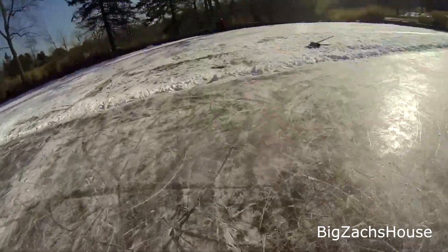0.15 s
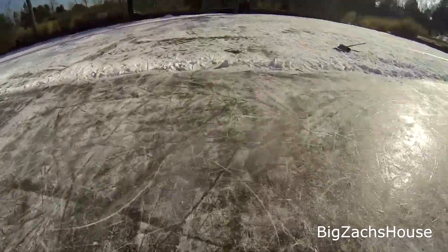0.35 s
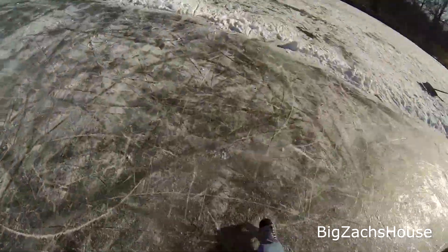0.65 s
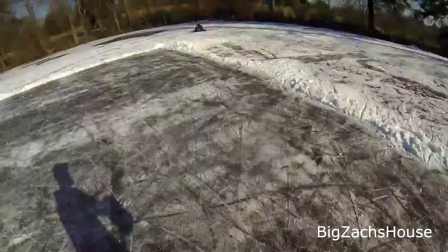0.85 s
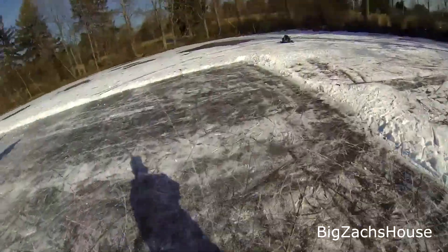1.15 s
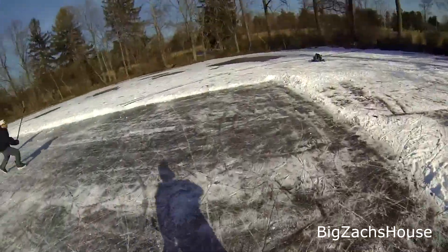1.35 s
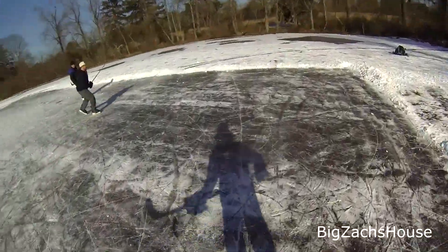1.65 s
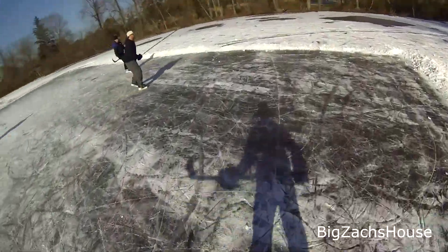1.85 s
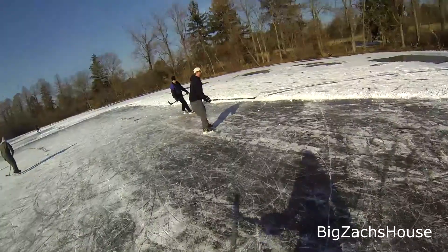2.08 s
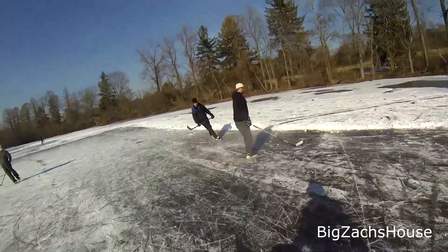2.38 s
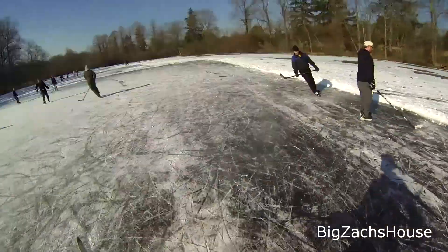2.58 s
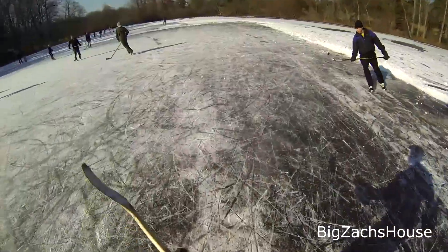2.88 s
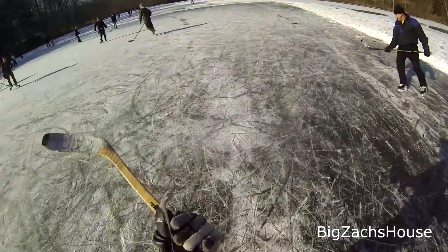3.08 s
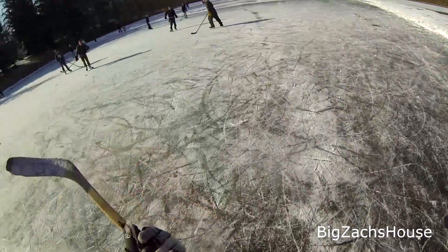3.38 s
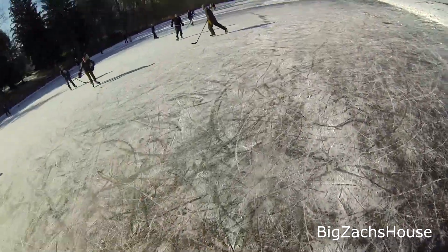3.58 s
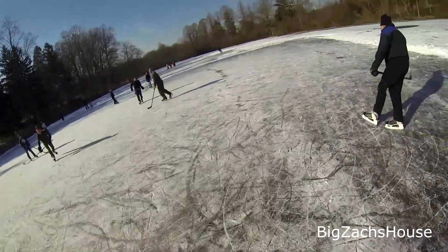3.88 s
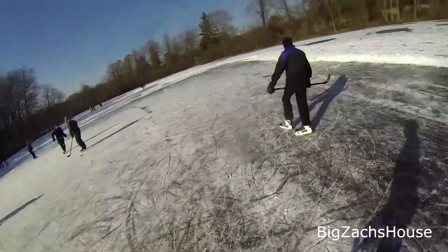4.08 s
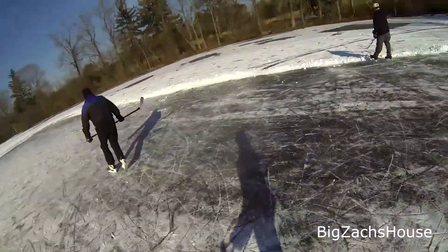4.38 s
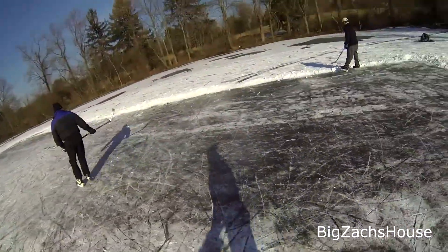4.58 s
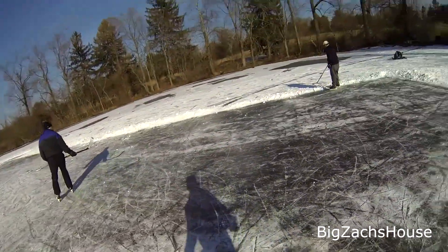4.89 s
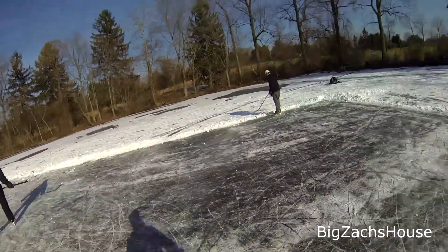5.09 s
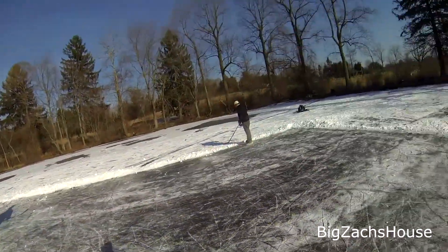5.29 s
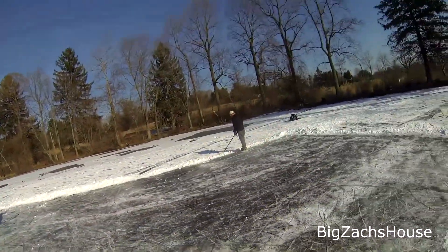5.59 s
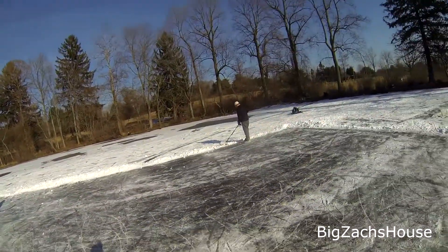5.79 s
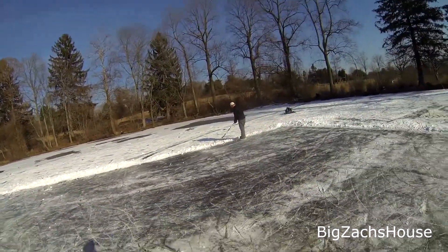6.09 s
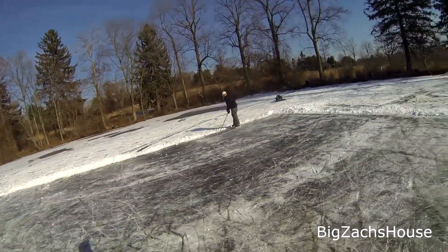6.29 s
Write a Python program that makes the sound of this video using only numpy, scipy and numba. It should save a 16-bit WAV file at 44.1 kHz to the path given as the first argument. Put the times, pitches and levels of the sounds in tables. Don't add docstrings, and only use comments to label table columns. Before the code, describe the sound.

A skater moves over a frozen pond, heard close from a head-mounted camera in a closed plastic housing, so everything is boxy and short on treble. The blade shaves and glides from the start, swelling into its hardest, hissing scrape at about 0.8-0.9 s, then easing to lighter, chattering strokes. Small dry knocks of sticks and pucks dot the opening; crumbly ice ticks crowd in from 1 to 2 s. Low wind thumps and flutters on the microphone, heaviest from about 1.4 to 3 s. A bright, quick falling chirp in the ice lands at 2.4 s. Another wind thump and a tight cluster of sharp stick clicks come around 4.2 s. After 5 s the wind fades, leaving faint hiss, soft scrapes and a wavering low ice hum, clearest near 5.7 s. A dull, quick blow and knock sound at 6.26 s.

```python
import sys
import numpy as np
from scipy import signal
from scipy.fft import rfft, irfft
from scipy.io import wavfile
from scipy.ndimage import uniform_filter1d
from numba import njit

SR = 44100
rng = np.random.default_rng(int(sys.argv[2]) if len(sys.argv) > 2 else 0)


def invert_db(x):
    u = np.asarray(x, float) / 20
    return 10 ** u


def wrap_up_sound(samples):
    columns = np.atleast_2d(samples).T
    tamed = np.clip(columns, -1, 1)
    steps = np.round(tamed * 32767).astype(np.int16)
    wavfile.write(sys.argv[1], SR, steps)


N = 284445

# (time [s], strength [dB], turbulence [dB])
WIND_GUSTS = [(0.0, -31, -1.5), (.4, -25.5, -13), (.63, -40, 6.5), (.9, -32.5, 1), (1.17, -34.5, -3.5),
              (1.27, -26, -11), (1.4, -20, -9), (1.7, -15.5, -7), (2.2, -23, -1.5), (2.65, -16.5, -6.5),
              (3.0, -24, -3.5), (3.12, -27.5, -3.5), (3.25, -25.5, -10.5), (3.38, -30, -4.5),
              (3.5, -45, -21), (3.58, -28.5, -12), (3.68, -29, -17), (4.15, -21, -12), (4.58, -24, -11),
              (4.66, -39.5, -20), (5.3, -45.5, -12), (6.45, -50, -0.5)]
# (time [s], strength [dB], heave share [dB])
PORT_SLAPS = [(.42, -29, 3), (1.4, -43, -15), (1.64, -22, 4), (1.72, -18.5, -10), (1.92, -18, -8),
              (2.12, -18.5, -2), (2.25, -20, 4), (2.35, -20, 7.5), (2.49, -16, -24), (2.64, -32, 8),
              (2.93, -27, -0.5), (3.36, -38, 19), (3.65, -28.5, 11), (3.88, -44, 4), (4.02, -22.5, -2),
              (4.22, -17, -20), (4.56, -31, 18), (4.9, -54, 25), (5.51, -40.5, 12), (5.62, -34.5, 13.5),
              (5.84, -42.5, 14), (6.041, -46, 21), (6.2, -37, 7)]
# (frequency [Hz], level [dB per Hz])
FLUTTER_SPECTRUM = [(71, -41), (120, 5), (247, -3.5), (430, -10), (700, -14.5), (910, -47), (1540, -120)]
# (peak time [s], rise [s], fall [s], level [dB])
GLIDE_HUMS = [
    (5.09, 0.067, 0.052, -40),
    (5.2, 0.016, 0.032, -41),
    (5.322, 0.006, 0.046, -34.5),
    (5.66, 0.11, 0.2, -34.5),
    (5.85, 0.055, 0.066, -35.5),
    (6.058, 0.02, 0.013, -38),
    (6.15, .015, 0.026, -38),
    (6.32, 0.05, 0.043, -42.5),
]
# (time [s], peak level [dB], first pitch [Hz], time to peak [s], narrowness [1])
ICE_PINGS = [
    (2.3901, -10.5, 4400, .0012, 4.5),
    (6.2637, -8.5, 1700, .00052, .8),
    (4.5965, -25, 2600, .001, 2.5),
]
# (time [s], peak level [dB], body [Hz], ring t60 [s], crack re ring [dB])
STICK_KNOCKS = [(0.241, -13, 880, 0.0088, 21), (0.452, -17, 800, 0.011, 8), (1.083, -13.5, 1680, 0.017, 0),
                (1.175, -22, 1670, 0.019, 7), (1.311, -25, 1700, 0.023, 0), (1.651, -24, 1610, 0.017, -5),
                (1.965, -24, 905, 0.013, 15), (2.2065, -15.5, 1690, 0.011, 6),
                (2.224, -22, 1620, 0.021, -3), (2.3935, -22, 1500, 0.015, 15),
                (2.9365, -19.5, 860, 0.026, 3), (2.984, -21, 860, 0.03, -5), (3.56, -24, 940, 0.02, -3),
                (3.642, -20, 810, 0.018, 2), (4.031, -18.5, 920, 0.02, -6), (4.14, -20, 1010, 0.0065, 8),
                (4.1615, -13.5, 920, 0.0086, 10), (4.163, -14, 1120, 0.0059, 23),
                (4.1765, -10, 900, 0.0091, 19), (4.1783, -19.5, 1084, 0.033, 26),
                (4.5975, -30, 1200, 0.0083, -8), (4.602, -23.5, 1620, 0.0064, 1),
                (4.606, -34, 1580, 0.0092, -10), (4.96, -30, 870, 0.017, 7), (5.277, -30, 1750, 0.017, -9),
                (5.391, -24, 830, 0.01, 7), (6.2642, -19, 1680, 0.012, 10), (6.2672, -17.5, 930, 0.022, 8)]
# (time [s], peak level [dB], tick [Hz], dull body re tick [dB])
ICE_CHIPS = [(0.879, -37, 3380, 12), (1.0441, -42, 3570, 12), (1.0826, -29, 3580, 12),
             (1.127, -35, 3510, 11), (1.237, -29, 3570, 9), (1.309, -43, 3590, 14), (1.3484, -48, 3510, 10),
             (1.4234, -40.5, 3670, 12), (1.4684, -38, 3810, 14), (1.513, -46, 3340, 14),
             (1.5389, -37, 3880, 17), (1.6039, -39, 3390, 12), (1.6399, -47, 3350, 12),
             (1.6504, -49, 3420, 12), (1.7026, -42, 3880, 12), (1.719, -37, 3750, 16.5),
             (1.77, -42, 3370, 12), (1.8248, -45, 3500, 12), (1.9444, -49, 3320, 12),
             (1.9628, -39, 3440, 16), (2.1129, -45, 3830, 12), (2.2064, -48, 3580, 7),
             (2.2239, -44, 3320, 9), (2.3989, -49, 3330, 12), (2.5238, -43, 3480, 12),
             (2.7671, -40, 3780, 10), (2.9863, -47, 3360, 12), (3.2846, -42.5, 3780, 11),
             (3.3938, -41, 3710, 12), (3.4303, -38, 3480, 12), (3.4607, -37, 3710, 13),
             (3.8777, -38, 3700, 12), (4.139, -44, 3330, 12), (4.1633, -35, 3640, 13),
             (4.1751, -30, 3540, 12), (4.2988, -40, 3350, 12), (5.5814, -41, 3560, 10),
             (5.7924, -35, 3530, 15)]
# (time [s], peak level [dB], tick [Hz])
ICE_SPLINTERS = [(1.0063, -48, 5280), (1.0442, -48, 5280), (1.1605, -56, 5410), (1.1744, -53, 5110),
                 (1.1989, -51, 5240), (1.2368, -47, 5040), (1.3211, -44, 5690), (1.4244, -51, 5130),
                 (1.468, -45, 5330), (1.4847, -54, 5180), (1.5386, -53, 5060), (1.604, -56, 5030),
                 (1.6379, -51, 5180), (1.6608, -58, 5030), (1.7147, -52, 5490), (1.9352, -54, 5010),
                 (2.0135, -62, 5020), (2.1133, -57, 5090), (2.1557, -57, 5270), (2.225, -51, 5310),
                 (2.2435, -44, 5630), (2.3488, -45, 5130), (2.3902, -43, 8500), (2.4191, -60, 5080),
                 (2.4969, -52, 5000), (2.5244, -47, 5040), (2.6152, -54, 5050), (3.0557, -50, 5180),
                 (3.125, -53, 5120), (3.1619, -53, 5360), (3.1938, -46, 5280), (3.2417, -50, 5090),
                 (3.2916, -51, 5250), (3.3415, -52, 5330), (3.4617, -50, 5500), (3.5685, -52, 8270),
                 (3.6239, -54, 5140), (3.6947, -55, 5000), (3.6947, -53, 5280), (3.8279, -53, 5030),
                 (3.8783, -53, 5330), (3.8987, -52, 5400), (4.1387, -49, 5220), (4.1621, -47, 5050),
                 (4.2205, -54, 5250), (4.2998, -42, 5060)]
# (peak time [s], rise [s], fall [s], pressure [dB], skid as ice thrown re pressure [dB])
EDGE_PUSHES = [(0.0, .1, 0.11, -32.5, -20.5), (.4, 0.34, 0.31, -29.5, -22.5), (.6, 0.29, 0.21, -26.5, -26),
               (.77, 0.21, 0.21, -18, -38.5), (.9, 0.13, 0.12, -19.5, -38.5),
               (1.201, 0.2, 0.27, -36.5, -27.5), (1.55, 0.14, 0.2, -33.5, -37.5),
               (1.801, 0.13, 0.17, -31.5, -34), (2.222, 0.19, 0.11, -33, -32.5),
               (2.48, 0.057, 0.046, -40.5, -27), (2.749, 0.16, 0.25, -32, -28.5),
               (2.92, 0.32, 0.26, -35, -25), (3.3, 0.14, 0.9, -38, -23.5), (3.67, 0.084, 0.039, -44, -30),
               (3.89, 0.12, 0.31, -36.5, -24), (4.25, 0.2, 0.2, -37.5, -23.5),
               (4.62, 0.3, 0.42, -53, -16.5), (5.0, 0.04, 0.11, -47.5, -18), (5.099, 0.11, 0.13, -42, -30),
               (5.38, 0.089, 0.64, -45, -29), (5.691, 0.16, 0.18, -34, -15.5),
               (5.93, 0.18, 0.063, -39, -27), (6.28, 0.52, 0.17, -47, -21.5),
               (6.45, 0.078, .1, -44.5, -36.5)]
# (time [s], weight [dB], drone [Hz], edge lean [dB])
BLADE_GLIDE = [(0.0, -21, 980, 6.5), (.17, -27.5, 800, 6.5), (.3, -24.5, 800, 5), (.55, -23.5, 708, 5.5),
               (.94, -26, 617, 5), (1.14, -32.5, 978, 2.5), (1.75, -36, 900, 7), (2.12, -35.5, 916, 5.5),
               (2.4, -33, 814, 6), (2.66, -27.5, 920, 2), (2.97, -33, 870, 5.5), (3.6, -36.5, 898, 0.5),
               (4.28, -34.5, 905, -2.5), (4.45, -40.5, 910, 1), (5.08, -38.5, 847, 6.5),
               (5.3, -44.5, 734, 2), (5.69, -34.5, 900, 5), (6.02, -44, 803, 2)]
# (time [s], fine ring [Hz], port facing the ice [dB])
HEAD_TURNS = [(0.0, 8900, 3.5), (.3, 8400, 3), (.9, 8200, -0.5), (1.4, 8250, 5), (1.75, 8740, -8),
              (2.5, 8200, 1.5), (2.68, 9700, 1.5), (2.79, 9350, 8.5), (2.9, 8600, 4.5), (3.2, 8700, 2),
              (3.5, 8450, 3), (3.75, 8800, -2), (4.0, 8400, 1), (4.2, 8350, -4), (5.0, 8570, -1),
              (5.3, 9300, -9), (5.7, 10000, 1), (5.95, 9700, -3), (6.45, 8760, -3)]
# (time [s], ring [Hz], ring level [dB])
SEAM_SPRAY = [(0.0, 4660, 0), (.3, 4850, 7), (.7, 4950, 1.5), (1.05, 4820, -4), (1.25, 5250, 7.5),
              (1.45, 4820, -4), (1.9, 4730, 5.5), (2.25, 5000, 2.5), (2.5, 4820, -3), (2.85, 5500, 0),
              (3.3, 5100, -4), (3.6, 5350, 3), (3.95, 5280, 4.5), (4.2, 5120, -7), (5.3, 4930, -6),
              (5.7, 5120, -8.5), (6.45, 5100, -7)]
# (frequency [Hz], level [dB per Hz])
HOUSING_SPECTRUM = [(240, -17.5), (400, 5.5), (480, -7.5), (594, -2.5), (968, -1.5), (1310, -1),
                    (1730, -4.5), (2340, -12.5), (2900, -22), (4120, -44.5), (5330, -48.5), (6910, -53),
                    (8680, -43.5), (12900, -49), (15300, -45)]
# (frequency [Hz], width [Hz], gain [dB])
CAVITY_RINGS = [(1840, 240, 3.5), (2666, 770, 9), (3720, 1040, 8.5), (5080, 1700, 10.5), (6270, 300, 7),
                (8200, 580, 4.5), (12900, 700, 12), (14700, 500, 4), (6900, 380, -3.5), (13800, 600, -3)]

ATTACK_S = 0.0003


def level(x, db=0):
    return x * invert_db(db) / np.sqrt(np.mean(x ** 2))


def curves(table):
    s, *columns = np.transpose(table)
    return [np.interp(np.arange(N) / SR, s, column) for column in columns]


def swells(peak_s, rise_s, fall_s, db):
    swell_db, roundness = 14, 0.63
    t = np.arange(0, N + 64, 64) / SR
    peak = np.c_[peak_s]
    away = (t - peak) / np.where(t < peak, -np.c_[rise_s], np.c_[fall_s])
    swell = np.c_[db] - swell_db * (np.hypot(away, roundness) - roundness)
    power = np.sum(invert_db(swell) ** 2, axis=0)
    return np.interp(np.arange(N) / SR, t, 10 * np.log10(power + 1e-10))


def walk(rate):
    k = max(int(SR / rate), 2)
    held = np.repeat(rng.standard_normal(N // k + 1), k)
    return 1.47 * uniform_filter1d(uniform_filter1d(held, k), k)[:N]


def noise():
    return rng.standard_normal(N)


def grit(per_s, spread_db):
    chance = rng.random((3, N))
    size_db = np.minimum(-spread_db * np.log(1 - chance[2]), 13)
    return (chance[0] < per_s / SR) * np.sign(chance[1] - 0.5) * invert_db(size_db)


def band(x, lo_hz, hi_hz, order=3):
    return signal.sosfilt(signal.butter(order, [lo_hz, hi_hz], "band", fs=SR, output="sos"), x)


def lowpass(x, hz, order):
    return signal.sosfilt(signal.butter(order, hz, fs=SR, output="sos"), x)


@njit
def svf(x, hz, width):
    y, b, l = np.empty(len(x)), 0., 0.
    for i in range(len(x)):
        g, k = np.tan(np.pi * hz[i] / SR), width / hz[i]
        v = (b + g * (x[i] - l)) / (1 + g * (g + k))
        b, l, y[i] = 2 * v - b, l + 2 * g * v, k * v
    return y


def ring(x, hz, width):
    return svf(svf(x, hz, width), hz, width)


def colour(x, points, rings=()):
    size = 8192
    hz = np.maximum(np.arange(size // 2 + 1) * SR / size, 1)
    point_hz, point_db = np.transpose(points)
    db = np.interp(np.log(hz), np.log(point_hz), point_db)
    db = db + sum(g / (1 + ((hz - f) / w * 2) ** 2) for f, w, g in rings)
    cepstrum = irfft(np.log(invert_db(db)))
    cepstrum[1:size // 2] *= 2
    cepstrum[size // 2 + 1:] = 0
    response = irfft(np.exp(rfft(cepstrum)))[:size // 2]
    return signal.fftconvolve(x, response)[:N]


def microphone_hiss():
    hiss = level(band(noise(), 9700, 10500, order=2), -80.5)
    hiss = hiss + level(band(noise(), 5600, 9000, order=2), -77)
    return hiss + level(band(noise(), 11000, 15300, order=2), -90.5) * invert_db(2.5 * walk(12))


def snow_bank(hits):
    t = np.arange(SR // 4) / SR
    smear = rng.standard_normal(len(t)) * np.exp(-t / 0.024)
    smear = level(band(smear, 470, 2300, order=2), -62)
    return signal.fftconvolve(hits, smear)[:N]


def glide_hum():
    hz = 310 * (1 + 0.05 * walk(14))
    drone = ring(noise(), hz, 85.0) * invert_db(1.2 * walk(30))
    return level(drone, -0.2) * invert_db(swells(*np.transpose(GLIDE_HUMS)))


def ice_pings():
    out, t = np.zeros(N + SR), np.arange(SR // 50) / SR
    last_hz = 1050
    for s, db, first_hz, peak_s, narrow in ICE_PINGS:
        x = t / peak_s
        hz = last_hz + (first_hz - last_hz) * np.exp(-1.6 * x)
        swell = (x * np.exp(1 - x)) ** narrow
        out[int(s * SR):][:len(t)] += invert_db(db) * swell * np.sin(2 * np.pi * np.cumsum(hz) / SR)
    return lowpass(out[:N], 3500, 4)


def knocks():
    out, t = np.zeros(N + SR), np.arange(SR // 8) / SR
    modes = ((1, 19, 1.2), (1.4, 15, 1.6), (1.7, 14, 1.1), (2.15, 11, 1.1))  # (ratio, dB, decay power)
    bend = t + 0.0001 * (1 - np.exp(-t / 0.0005))
    for s, db, hz, t60, crack_db in STICK_KNOCKS:
        fade = np.exp(-np.log(1000) * t / max(t60, 0.003)) * (1 - np.exp(-t / ATTACK_S))
        body = sum(invert_db(g) * np.sin(2 * np.pi * hz * k * bend) * fade ** d for k, g, d in modes)
        high_ring = invert_db(-13) * np.sin(2 * np.pi * 3700 * t) * fade
        crack = band(rng.standard_normal(len(t)) * fade ** 4.1, 2000, 4800, order=2)
        hit = lowpass(body, 2400, 6) + high_ring + invert_db(crack_db) * crack
        hit = lowpass(hit, 4300, 4)
        hit = invert_db(db) * hit / np.max(np.abs(hit))
        out[int(s * SR):][:len(t)] += hit
        out[int((s + 0.0036) * SR):][:len(t)] += invert_db(-21) * hit
    return out[:N]


def wind():
    gust_db, turbulence_db = curves(WIND_GUSTS)
    s, slap_db, share_db = np.transpose(PORT_SLAPS)
    rise_s, fall_s = np.full_like(s, 0.079), np.full_like(s, 0.04)
    puff = 0.7 * walk(9)
    eddies = level(grit(300, spread_db=-0.5)) + level(noise(), -1.1)

    heave = level(band(noise(), 24, 46, order=2), -4.5)
    heave_slaps = invert_db(swells(s, rise_s, fall_s, slap_db + share_db))
    heave = heave * np.hypot(invert_db(-10.5 + 0.5 * gust_db), heave_slaps)

    thump = level(band(eddies, 54.7, 137.7, order=2) * invert_db(puff))
    thump = thump * np.hypot(invert_db(gust_db - 0.5), invert_db(swells(s, rise_s, fall_s, slap_db)))

    flutter = level(colour(eddies, FLUTTER_SPECTRUM) * invert_db(puff + 1.3 * walk(22.15)))
    flutter = flutter * invert_db(gust_db + turbulence_db + 0.5)

    weight_db = curves(BLADE_GLIDE)[0]
    sole = level(band(eddies[::-1], 190, 480, order=2)) * invert_db(weight_db - 5.5 + 1.2 * walk(20))
    return heave + thump + flutter + sole


def chips():
    out, t = np.zeros(N + SR), np.arange(SR // 20) / SR
    fade = np.exp(-t / 0.0029) * np.minimum(t / ATTACK_S, 1)
    for s, db, hz, body_db in ICE_CHIPS:
        crumble = rng.standard_normal(len(t)) * fade
        tick = band(crumble, hz, 1.15 * hz, order=4)
        body = band(crumble, 1200, 3000, order=4)
        for part, part_db in ((tick, -8), (body, body_db - 5)):
            out[int(s * SR):][:len(t)] += invert_db(db + part_db) * part / np.max(np.abs(part))
    for s, db, hz in ICE_SPLINTERS:
        crumble = rng.standard_normal(len(t)) * fade
        tick = band(crumble, hz, 1.2 * hz)
        tick = tick + invert_db(-8) * band(crumble, 7500, 10500) + invert_db(-17) * band(crumble, 10500, 14500)
        out[int(s * SR):][:len(t)] += invert_db(db - 4) * tick / np.max(np.abs(tick))
    return out[:N]


def edge_shaving(judder, light):
    shave = judder * (level(grit(2500, spread_db=0.0), -7) + level(noise(), -9.5))
    return shave + level(grit(45, spread_db=0.5), -18) * light


def thrown_powder(shave, judder, fine_hz):
    powder = level(shave, -24) + judder ** 0.87 * noise()
    powder = colour(powder, HOUSING_SPECTRUM, CAVITY_RINGS)
    bounce = np.interp(np.arange(N) - 2 * SR / fine_hz, np.arange(N), powder)
    return powder + 0.14 * bounce


def blades():
    s, rise_s, fall_s, press_db, throw_db = np.transpose(EDGE_PUSHES)
    cut_db = swells(s, rise_s, fall_s, press_db)
    spray_db = swells(s, rise_s, fall_s, press_db + throw_db)
    skid_db = spray_db - cut_db
    weight_db, drone_hz, lean_db = curves(BLADE_GLIDE)
    fine_hz, facing_db = curves(HEAD_TURNS)
    spray_hz, seam_db = curves(SEAM_SPRAY)

    light = np.clip((-cut_db - 15) / 20, 0.35, 1)
    judder = invert_db(light * (0.8 * walk(40) + 1.7 * walk(110)))
    shave = edge_shaving(judder, light)
    powder = thrown_powder(shave, judder, fine_hz)
    heard = colour(shave, HOUSING_SPECTRUM, CAVITY_RINGS)

    drone = level(band(heard, 475, 1150), 0.68) + level(ring(shave, drone_hz, 314.0), -2)
    drone_db = weight_db + 0.3 * (cut_db + 39)

    cut_hz = 1660 + 13 * np.maximum(cut_db + 25.5, 0) + 30 * walk(9.7)
    cut = level(band(heard, 1533, 2290), -5.5) + level(ring(shave, cut_hz, 298.0), -4.5)

    rasp_hz = 2837 + 7.6 * (skid_db + 23.5) + 40 * walk(6.9)
    rasp = level(band(heard, 2570, 4250, order=4)) + level(ring(shave, rasp_hz, 420.0), -4)
    cavity = level(ring(shave, 3720 * (1 + 0.012 * walk(8)), 450.0), -8)
    rasp = rasp + cavity * invert_db(1.1 * walk(9) - 0.5 * lean_db)
    rasp_db = cut_db + 0.4 + 0.59 * skid_db + lean_db

    whistle = level(ring(powder, spray_hz * (1 + 0.015 * walk(10)), 600.0), -5.5)
    spray = level(band(powder, 4250, 7000, order=4)) + whistle * invert_db(1.5 * walk(14) + seam_db)

    fine_ring = level(ring(noise(), fine_hz * (1 + 0.015 * walk(12)), 800.0), -3.5)
    fine = level(band(powder, 7000, 11500, order=4), -3) + fine_ring * invert_db(2.0 * walk(30))
    fine_db = spray_db - 12.5 - 0.19 * skid_db + facing_db + 1.2 * light * walk(60)

    air = band(powder, 11500, 15500, order=4)
    air_db = -76.5 + 1.4 * (fine_db + 64.5) + 1.5 * light * walk(60)

    layers = ((cut, cut_db), (drone, drone_db), (rasp, rasp_db),
              (spray, spray_db), (fine, fine_db), (air, air_db))
    return sum(level(x) * invert_db(db + 0.7 * light * walk(25)) for x, db in layers)


def scene():
    hits = knocks() + ice_pings()
    background = microphone_hiss() + snow_bank(hits) + glide_hum() + hits
    return (background + wind() + chips() + blades())[None]


def roll_off(x):
    return signal.sosfilt(signal.butter(12, 15300, fs=SR, output="sos"), x)


def record(dry):
    soft = np.tanh(0.78 * dry) / 0.84
    top_cut = signal.ellip(8, 0.2, 70, 15330, fs=SR, output="sos")
    return roll_off(signal.sosfilt(top_cut, soft))


dry = scene()
out = record(dry)
wrap_up_sound(out)
```